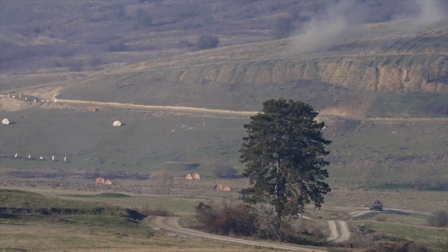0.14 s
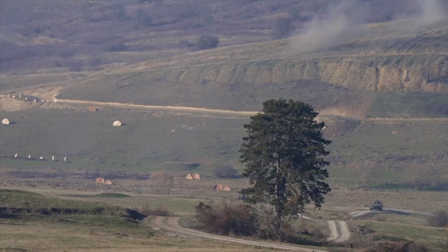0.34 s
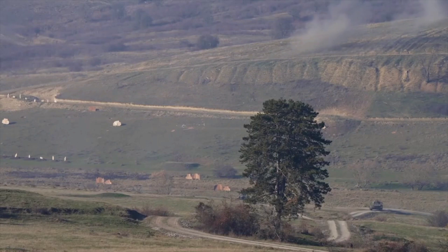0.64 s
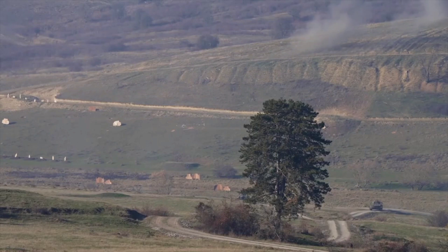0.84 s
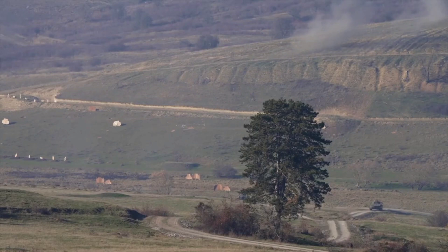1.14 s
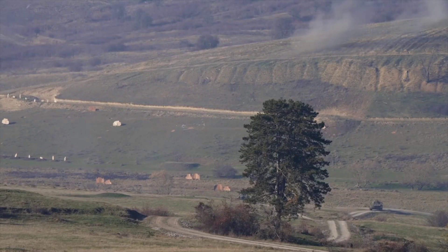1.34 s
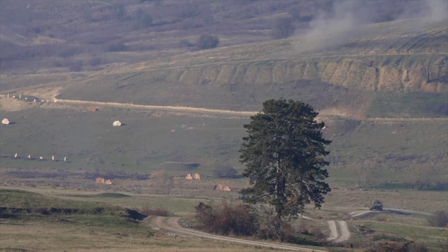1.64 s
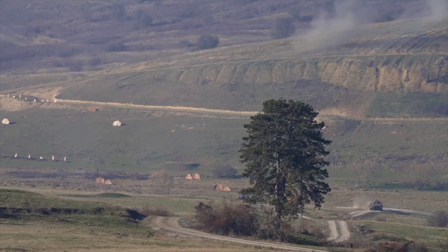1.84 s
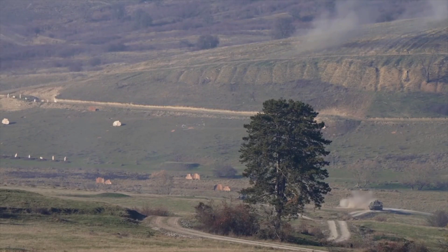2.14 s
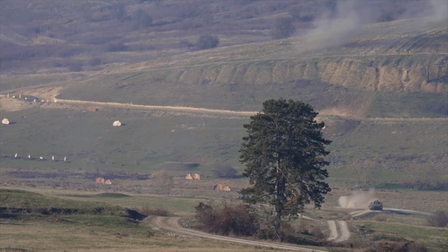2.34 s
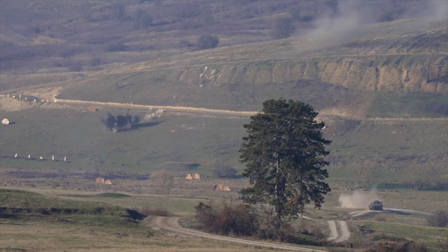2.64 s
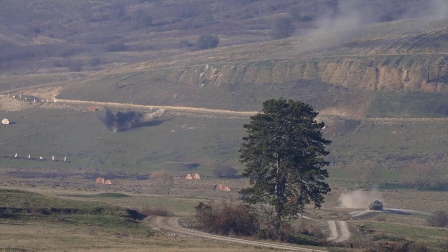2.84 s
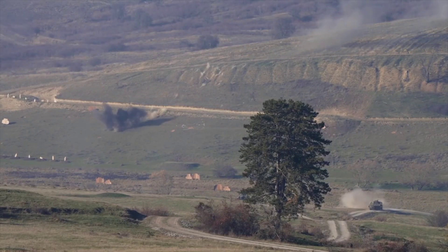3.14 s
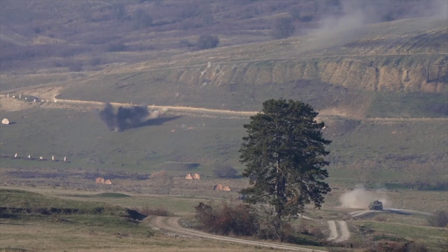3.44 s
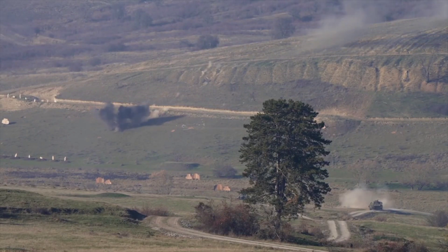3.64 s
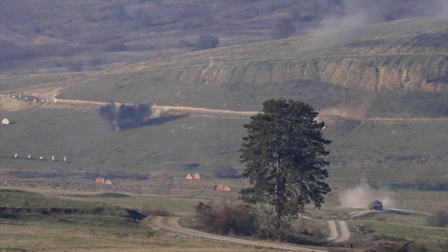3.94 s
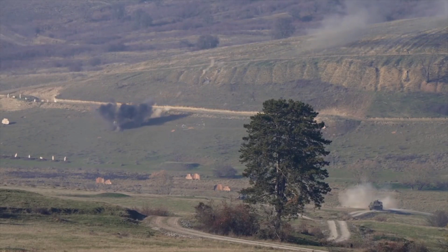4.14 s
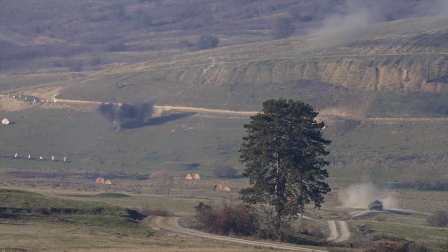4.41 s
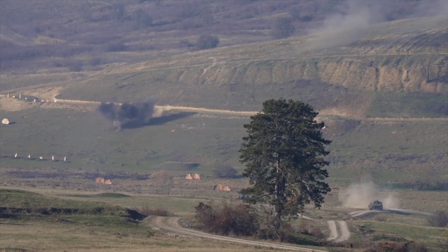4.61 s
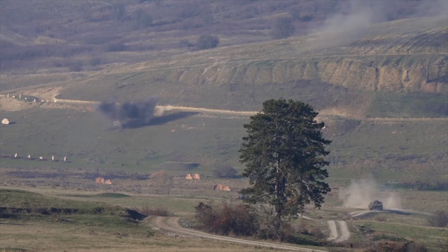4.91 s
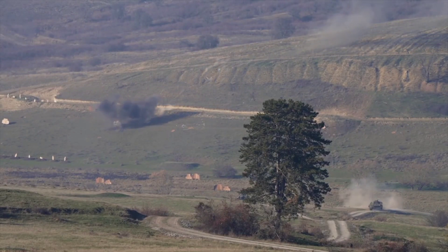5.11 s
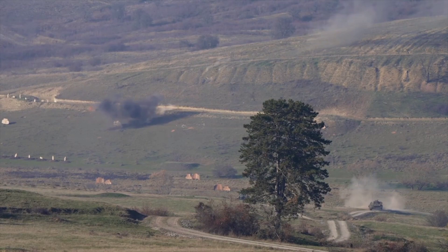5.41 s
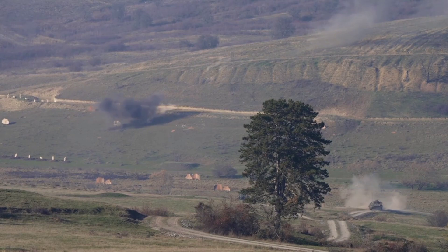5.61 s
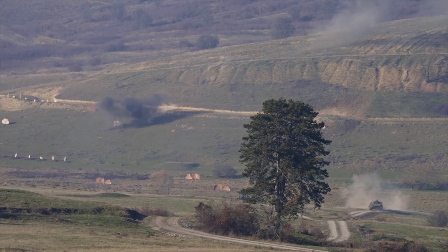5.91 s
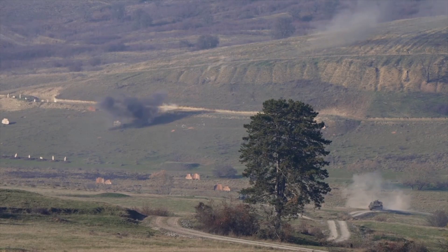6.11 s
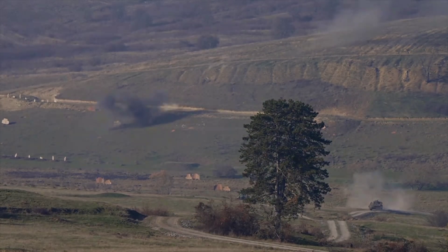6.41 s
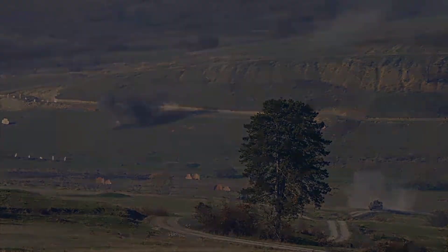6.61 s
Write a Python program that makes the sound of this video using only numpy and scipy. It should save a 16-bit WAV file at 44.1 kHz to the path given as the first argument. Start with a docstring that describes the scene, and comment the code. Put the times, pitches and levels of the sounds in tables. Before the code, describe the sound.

Outdoors on a wide hilly range, a distant microphone hears heavy gunfire from an armoured vehicle. A faint airy whoosh opens over an earlier shot's lingering roar, then at 0.1 s a cannon report cracks and thumps with a hollow boom. Echoes and deep thuds roll until a rounder, bassier shot at 1.5 s, a sharp, strong one at 2.1 s and another crackling blast at 3.3 s. At 4.6 s a loud report is followed by a second at 4.85 s, almost merging. Each has a split-second gritty crash, low microphone swings, a half-second tail, muffled slope echoes and hissing tree reflections. Deep rumble and lumpy roar fill every gap over barely audible hiss and tiny rustles. A bright echo washes past at 5.2 s. From about 5.7 s everything fades steeply; a final shot at 6.7 s is nearly buried before silence.

```python
"""Seven distant cannon reports at uneven intervals on an open range, over hill roar and a faint steady hiss.
Each report is one to three shock fronts that thump in the microphone, with crackle and a crash scattered
by ground and trees. A faint whoosh, perhaps a passing shell, comes before the first report.
The hills return short echoes, deep thuds and a long roar; these and the whoosh are shaped noise.
A limiter holds the peaks, and the closing fade all but hides the last report."""
import sys
import numpy as np
from scipy import signal
from scipy.fft import rfft, irfft, next_fast_len
from scipy.io import wavfile
from scipy.ndimage import uniform_filter1d, minimum_filter1d

SR = 44100
rng = np.random.default_rng(int(sys.argv[2]) if len(sys.argv) > 2 else 0)


def unload_wav(signal):
    """Save mono or channel-first audio to the path in sys.argv[1] as 16-bit WAV at rate SR, clipped to [-1, 1]."""
    wavfile.write(
        sys.argv[1],
        SR,
        np.round(np.clip(np.atleast_2d(signal).T, -1, 1) * 32767).astype(np.int16),
    )


N = 298380
TIME = np.arange(N) / SR  # seconds

# Shock fronts, direct or reflected, before the filters.
# Each row: start in seconds, pressure in dB, length of the push in ms, sharpness of the edge in Hz.
FRONTS = [(.1110, 3, 13, 2900), (0.1296, -1.5, 3.3, 131), (1.4615, -8.5, 4.8, 330), (1.4712, 7.5, 4.4, 560),
          (2.0825, 1, 4.7, 990), (2.09, 9.5, 4.3, 4780), (2.1166, -5, 8.9, 350), (3.2836, 0, 14, 1300),
          (3.2843, 0, 6.6, 450), (4.5972, 5, 5.9, 2880), (4.6074, -9, 18, 1510), (4.6255, 2, 25, 48),
          (4.834, -3.5, 5.7, 604), (4.8412, 5.5, 7.9, 1106), (6.692, 7.5, 7, 1970)]
# Spectrum of the short crash. Each row: frequency in Hz, level in dB per Hz before scaling to rms one.
CRASH_SPECTRUM = [(60, -19.5), (140, 1), (190, -2), (280, -1.5), (410, -2.5), (750, 3), (1400, -2),
                  (2200, -10), (3400, -15.5), (4800, -32), (8000, -50), (12000, -60.5)]
# Spectrum of the deep rumble. Each row: frequency in Hz, level in dB per Hz before scaling to rms one.
RUMBLE_SPECTRUM = [(12, -29), (25, -10), (42, -8), (58, 1), (75, -4), (105, -10.5), (150, -20), (300, -38),
                   (900, -87.5)]


def amp(db):
    """Decibels to gain."""
    return 10 ** (np.asarray(db) / 20)


def evened(x):
    """Scales to an rms of one."""
    return x / np.sqrt(np.mean(x ** 2) + 1e-20)


def read(points, hz):
    """Reads a spectrum on a log-frequency axis."""
    f, value = np.transpose(points)
    return np.interp(np.log(hz + 1), np.log(f + 1), value)


def tilted(spectrum, db_per_octave):
    """Brightens or dulls a spectrum about 1 kHz."""
    hz, db = np.transpose(spectrum)
    return np.c_[hz, db + db_per_octave * np.log2(hz / 1000)]


def add(mix, s, sound):
    """Mixes a sound in at time s, cut off at the end of the mix."""
    part = mix[max(round(s * SR), 0):][:len(sound)]
    part += sound[:len(part)]


def coloured(x, spectrum):
    """Gives x a spectrum and an rms of one."""
    size = next_fast_len(len(x))
    gain = amp(read(spectrum, np.fft.rfftfreq(size, 1 / SR)))
    return evened(irfft(rfft(x, size) * gain, size)[:len(x)])


def lowpass(x, hz, order=1):
    """Causal low-pass."""
    return signal.lfilter(*signal.butter(order, min(hz, SR / 2 - 1), fs=SR), x)


def drift(hz, size):
    """Slow random wander of rms one."""
    return evened(lowpass(rng.standard_normal(size), hz, order=2))


def scatter(spectrum, lumpy_db, lump_hz, size=N):
    """Noise with a wandering level, like countless small reflections that arrive in clumps."""
    clumps = amp(lumpy_db * drift(lump_hz, size))
    return coloured(rng.standard_normal(size) * clumps, spectrum)


def burst(rise, t60):
    """One second of envelope: a rounded rise and an exponential fall."""
    t = np.arange(SR) / SR
    return (1 - np.exp(-t / rise)) * np.exp(-np.log(1000) * t / t60)


def swells(rows):
    """A level made of bell-shaped swells, one for each (s, dB, length s)."""
    return sum(amp(db) * np.exp(-np.pi * ((TIME - s) / length) ** 2) for s, db, length in rows)


def steady_hiss(level_db=-85.5):
    """Faint background noise at an even level."""
    # Each row: frequency in Hz, level in dB per Hz before scaling.
    hiss_spectrum = [(100, 3), (4000, 1), (7000, 0.5), (11000, -4.5), (13000, -5.5)]
    return amp(level_db) * coloured(rng.standard_normal(N), hiss_spectrum)


def rustles():
    """Short soft swells of high noise near the microphone."""
    # Each row: crest in seconds, level in dB, length in seconds.
    rustle_rows = [(0.585, -83, 0.078), (0.805, -83, 0.13), (1.96, -79, 0.049), (3.08, -83, 0.043),
                   (4.368, -80.5, .07)]
    # Each row: frequency in Hz, level in dB per Hz before scaling.
    rustle_spectrum = [(2500, -24), (5500, -3), (9000, -4), (12000, -7)]
    return swells(rustle_rows) * scatter(rustle_spectrum, lumpy_db=3.0, lump_hz=120)


def rolling(s, crest_s):
    """A swell that starts at s, reaches one after crest_s and ebbs exponentially."""
    age = np.maximum(TIME - s, 0) / crest_s
    return age * np.exp(1 - age)


def patchy(x, patch_db=1.68, patch_hz=220, patch_s=0.045):
    """Reflections add and cancel by chance: patches of colour come and go."""
    hz, t, z = signal.stft(x, SR, nperseg=1024, noverlap=768)
    field = rng.standard_normal(z.shape[::-1]).T
    field = uniform_filter1d(field, max(round(patch_hz / hz[1]), 1), axis=0)
    field = uniform_filter1d(field, max(round(patch_s / t[1]), 1), axis=1)
    patched = z * amp(patch_db * evened(field))
    return evened(signal.istft(patched, SR, nperseg=1024, noverlap=768)[1][:len(x)])


def flutter(per_s=14, strength=0.28, rise=.004, t60=0.32):
    """Small returns arrive at random, each a quick lift in level."""
    arrivals = np.minimum(rng.exponential(1, N), 2) * (rng.random(N) < per_s / SR)
    lifts = signal.oaconvolve(arrivals, burst(rise, t60))[:N]
    return evened(1 + strength * lifts)


def hills(rumble_db=-1.5, bass_hz=380):
    """Reports swell and ebb round the hills: deep rumble, a lumpy roar, and the hiss that survives the air."""
    # Rolls round the hills; the first is left from an earlier shot.
    # Each row: start in seconds, scale of the roar in dB, seconds until its crest,
    # bass in dB over the roar, hiss in dB over the roar.
    rolls = [(-0.97, -44, .4, 0, -15.5), (-0.05, -44.5, 0.42, -10.5, -16.5), (1.63, -48.5, 0.36, 5, -21),
             (2, -45, .6, -0.5, -17.5), (3, -44, 0.62, 2.5, -17.5), (4.5, -43, .55, -6, -18),
             (5, -41, 0.5, -5, -17.5)]
    # Noise colours of the roar and the hiss. Each row: frequency in Hz, level in dB per Hz before scaling.
    roar_spectrum = [(60, -16), (130, -2.5), (250, 0), (380, -1), (560, 1.35), (850, -0.5), (1150, -5),
                     (1700, -8), (2300, -22.5), (3000, -39.5), (4200, -53.5), (7000, -80.5)]
    hiss_spectrum = [(900, -28.5), (2000, 7), (2900, 0.5), (3600, -8.5), (4500, -19.5), (5600, -34.5),
                     (8000, -49.5)]
    bass_lag = 1.64  # the longest paths return only bass, so it crests this many times later
    # exponents on the swell: higher gives a narrower crest; the bass lingers, the air soon takes the treble
    bass_shape, roar_shape, hiss_shape = .55, 0.67, 1.3

    bass_power, middle_power, treble_power = np.zeros((3, N))
    for s, db, crest_s, bass_db, hiss_db in rolls:
        swell = rolling(s, crest_s)
        late_swell = rolling(s, bass_lag * crest_s)
        bass_power += (amp(db + bass_db) * late_swell ** bass_shape) ** 2
        middle_power += (amp(db) * swell ** roar_shape) ** 2
        treble_power += (amp(db + hiss_db) * swell ** hiss_shape) ** 2

    rumble = amp(rumble_db) * coloured(rng.standard_normal(N), RUMBLE_SPECTRUM)
    roar = patchy(scatter(roar_spectrum, lumpy_db=0.76, lump_hz=25))
    hiss = patchy(scatter(hiss_spectrum, lumpy_db=1.2, lump_hz=60))
    low_roar = lowpass(roar, bass_hz)
    deep = np.sqrt(bass_power) * (rumble + low_roar)
    upper = np.sqrt(middle_power) * (roar - low_roar) + np.sqrt(treble_power) * hiss
    return deep + flutter() * upper


def thuds():
    """The farthest slopes return only the bass."""
    # Each row: crest in seconds, level in dB, length in seconds.
    thud_rows = [(.23, -34, 0.15), (.53, -40.5, 0.2), (2.3, -33, 0.077), (2.83, -37.5, 0.21),
                 (3.41, -29.5, 0.072), (5.09, -37, 0.12), (5.26, -39, 0.11)]
    return swells(thud_rows) * coloured(rng.standard_normal(N), RUMBLE_SPECTRUM)


def bright_echoes():
    """Treble thrown back by trees swells in and dies slowly, cut off after one second."""
    # Late hissing echoes from wooded slopes.
    # Each row: start in seconds, level in dB before the envelope, rise in seconds, t60 in seconds.
    wooded_slopes = [(1.56, -59, 0.061, 1.5), (2.42, -62, .03, .9), (3.12, -58.5, .06, .8),
                     (3.70, -57.5, .12, 1.65), (5.188, -49.5, 0.033, 1.14)]
    # Each row: frequency in Hz, level in dB per Hz before scaling.
    treble_spectrum = [(700, -19), (1800, 5.5), (3000, -4.5), (4000, -6), (4900, -14), (5800, -32.5),
                       (8000, -58)]
    out = np.zeros(N)
    for s, db, rise, t60 in wooded_slopes:
        treble = scatter(treble_spectrum, lumpy_db=1.0, lump_hz=60, size=SR)
        add(out, s, amp(db) * treble * burst(rise, t60))
    return out


def whoosh_and_echoes():
    """A faint whoosh, then reports smeared into swells by single slopes; each is one band dulled by the air."""
    # Echoes from single slopes; the first row is a faint whoosh, perhaps a passing shell,
    # before the first report.
    # Each row: crest in seconds, level in dB, rise in seconds, band centre in Hz, width in octaves.
    band_swells = [(.025, -58.5, .013, 2300, 0.17), (.245, -37, 0.018, 850, 1.6),
                   (.43, -41.5, 0.086, 1020, 0.37), (1.201, -56, 0.093, 1830, 0.37),
                   (1.775, -40.5, 0.0066, 780, .42), (2.0, -40.5, 0.011, 617, 0.22),
                   (2.262, -37.5, .003, 895, 1.1), (2.76, -40, 0.0076, 626, .4),
                   (3.015, -43.5, .008, 557, 0.12), (3.18, -45.5, 0.054, 800, 0.59),
                   (3.45, -35, .012, 1380, 0.24), (3.535, -40, 0.007, 1390, 1.2),
                   (4.28, -41.5, 0.012, 710, .31), (4.716, -30, 0.0049, 1000, 0.71),
                   (4.785, -35, 0.11, 1100, 1.06)]
    # Colour the air gives every swell. Each row: frequency in Hz, gain in dB before scaling.
    air_spectrum = [(60, -5.5), (200, 9), (1500, 1), (2300, -7), (3100, -14), (4000, -31), (5200, -60.5),
                    (9000, -91)]
    fall_to_rise = 2.3  # a swell dies more slowly than it grows
    out, hz = np.zeros(N), np.geomspace(20, SR / 2, num=60)
    t = np.arange(SR) / SR
    for s, db, rise, centre_hz, octaves in band_swells:
        off_centre = np.log2(hz / centre_hz) / octaves
        band_db = -10 * np.log10(1 + off_centre ** 2) + read(air_spectrum, hz)
        start = max(s - .5, 0)
        lag = t + start - s  # seconds from the crest
        spread = np.where(lag < 0, rise, fall_to_rise * rise)
        swell = np.exp(-.5 * (lag / spread) ** 2)
        band_noise = scatter(np.c_[hz, band_db], lumpy_db=1.5, lump_hz=80, size=SR)
        add(out, start, amp(db) * swell * band_noise)
    return out


def crashes(crash_rise=0.00088, tail_rise=.012, rumble_rise=0.029, rumble_t60=0.89, boom_rise=0.006, boom_t60=0.12):
    """Near ground scatters a short crash and a hollow boom; trees and slopes add a tail and a slower rumble."""
    # Scatter of each report, levels before the envelopes.
    # Each row: start in seconds, crash in dB, crash t60 in seconds, tail in dB, tail t60 in seconds,
    # rumble in dB, brightness in dB per octave, hollow boom in dB.
    reports = [(.111, -15, 0.085, -34.5, 0.4, -46.5, 0.4, -16),
               (1.470, -20, .13, -22, 0.47, -25.5, 0, -38.5),
               (2.088, -10.5, 0.13, -25, 0.56, -25, 0.06, -3),
               (3.283, -9, 0.052, -27, 0.52, -22.5, 0.45, -24),
               (4.598, -5.5, 0.077, -23, 0.41, -32.5, -1.3, -17),
               (4.839, -13.5, 0.11, -19.5, 0.49, -32, 0, -13.5),
               (6.691, -4, 0.1, -27.5, .5, -22.5, -3, -20)]
    # Noise colours of the tail and the boom. Each row: frequency in Hz, level in dB per Hz before scaling.
    tail_spectrum = [(60, -8.5), (130, 9), (300, 3), (700, 2.5), (1400, -7.5), (2200, -13), (3400, -23.5),
                     (5000, -36.5), (8000, -56.5), (12000, -66.5)]
    boom_spectrum = [(100, -36.5), (215, -20), (255, -1), (320, 2), (380, -11.5), (700, -48), (2000, -91.5)]
    out = np.zeros(N)
    for s, crash_db, crash_t60, tail_db, tail_t60, rumble_db, bright_db, boom_db in reports:
        crash = scatter(tilted(CRASH_SPECTRUM, bright_db), lumpy_db=4.5, lump_hz=321.5, size=SR)
        add(out, s, amp(crash_db) * crash * burst(crash_rise, crash_t60))
        tail = scatter(tilted(tail_spectrum, bright_db), lumpy_db=1.0, lump_hz=90, size=SR)
        add(out, s, amp(tail_db) * tail * burst(tail_rise, tail_t60))
        rumble = coloured(rng.standard_normal(SR), RUMBLE_SPECTRUM)
        add(out, s, amp(rumble_db) * rumble * burst(rumble_rise, rumble_t60))
        boom = coloured(rng.standard_normal(SR), boom_spectrum)
        add(out, s, amp(boom_db) * boom * burst(boom_rise, boom_t60))
    return out


def ragged_edges(share_db=-17, t60=0.031, edge_ratio=3):
    """Turbulent air tears each front into a brief crackle, duller for a dull front."""
    out = np.zeros(N)
    for s, db, _, edge_hz in FRONTS:
        crackle = scatter(CRASH_SPECTRUM, lumpy_db=-0.5, lump_hz=596, size=SR) * burst(0.00016, t60)
        add(out, s, amp(db + share_db) * lowpass(crackle, edge_ratio * edge_hz))
    return out


def blasts(air_ratio=6):
    """A jump in pressure, a push and a longer suction; the path rounds off the edge."""
    out, t = np.zeros(N), np.arange(SR // 2) / SR
    for s, db, push_ms, edge_hz in FRONTS:
        u = t * 1000 / push_ms  # the push turns to suction at one
        wave = lowpass((1 - u) * np.exp(-u), edge_hz)
        wave = lowpass(wave, air_ratio * edge_hz, order=2)  # air takes the top off a dull front too
        add(out, s, amp(db) * wave)
    return lowpass(out, hz=8850)


def ground(x, dip_hz=395, dip_q=1.9, depth=.55):
    """The reflection from soft ground cancels part of the low middle."""
    return x - depth * signal.lfilter(*signal.iirpeak(dip_hz, dip_q, fs=SR), x)


def microphone(x, ring_hz=52.5, ring_q=1.8, cut_hz=28):
    """A resonant bass roll-off rings after a blast and turns each push into a few deep swings."""
    w = 2 * np.pi * ring_hz
    x = signal.lfilter(*signal.bilinear([1, 0, 0], [1, w / ring_q, w * w], SR), x)
    return signal.lfilter(*signal.butter(2, cut_hz, "high", fs=SR), x)


def scene():
    """A whoosh, the reports, their scatter and echoes over a faint steady hiss."""
    background = steady_hiss() + rustles()
    distant = hills() + thuds() + bright_echoes() + whoosh_and_echoes()
    scattered = ground(ragged_edges() + crashes(), depth=0.24)
    thumps = microphone(ground(blasts()))
    return (background + distant + scattered + thumps)[None]


def limiter(x, ceiling_db=-5.0, recover_db_per_s=220):
    """Turns down at once on a peak and recovers at a steady rate in dB; the fade's gain comes after."""
    over_db = np.maximum(20 * np.log10(abs(x) + 1e-9) - ceiling_db, 0)
    ramp = TIME * recover_db_per_s
    held_db = np.maximum.accumulate(over_db + ramp) - ramp
    gain = minimum_filter1d(amp(-held_db), size=31)
    return x * uniform_filter1d(gain, size=31)


def record(dry, headroom_db=7, edge_hz=12300):
    """Soft overload, limiter, closing fade and band limit."""
    # Output gain, steady until the closing fade. Each row: time in seconds, gain in dB.
    fade = [(5.66, 4.5), (6.0, -9), (6.28, -14.5), (6.5, -23.5), (6.7, -47), (6.78, -70)]
    driven = amp(headroom_db) * np.tanh(dry[0] / amp(headroom_db))
    faded = limiter(driven) * amp(np.interp(TIME, *np.transpose(fade)))
    band_limit = signal.firwin(255, edge_hz, window=("kaiser", 9), fs=SR)
    return signal.oaconvolve(faded, band_limit, "same")[None]


dry = scene()
out = record(dry)
unload_wav(out)
```